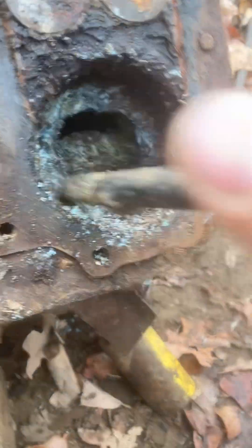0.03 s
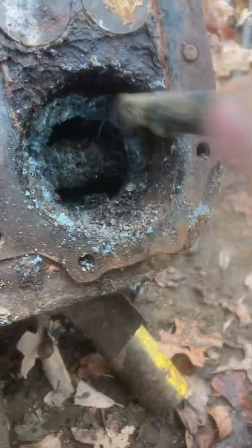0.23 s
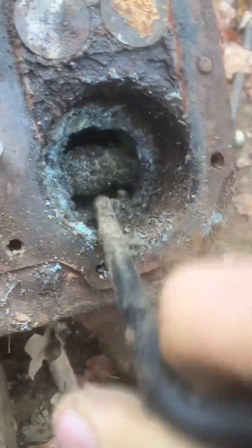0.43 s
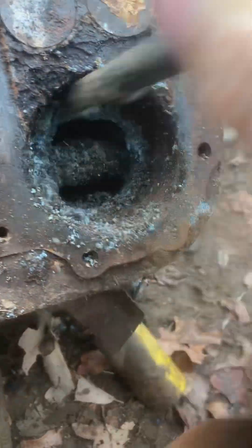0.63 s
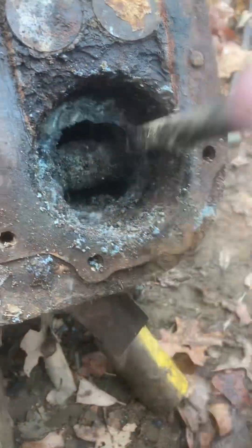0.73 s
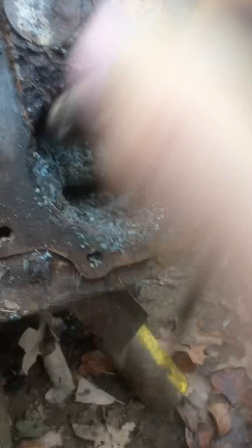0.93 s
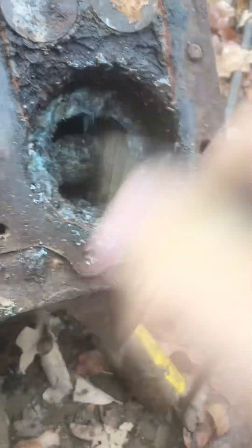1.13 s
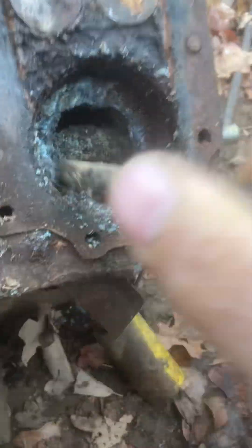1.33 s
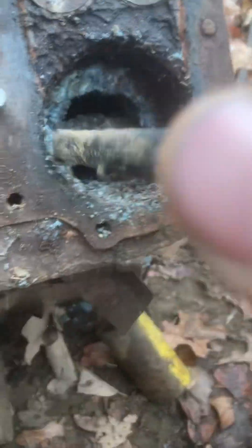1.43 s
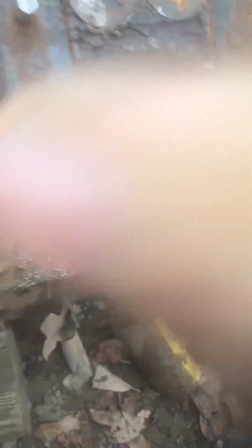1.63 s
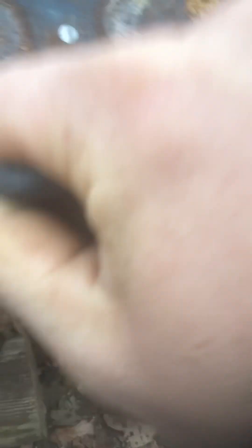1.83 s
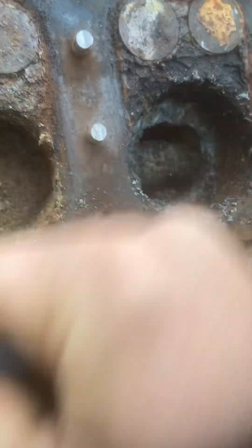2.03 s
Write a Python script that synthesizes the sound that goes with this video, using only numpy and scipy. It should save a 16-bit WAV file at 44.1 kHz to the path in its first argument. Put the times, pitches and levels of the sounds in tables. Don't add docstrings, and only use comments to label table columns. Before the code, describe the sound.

Close, dry, gritty metal clicks: a rod scratching crusted iron, dense quick blows mid-way, one sharp hit later, near quiet, then cloth rustle and final knocks with a dull hand bump, outdoors over low traffic rumble.

```python
import sys
import numpy as np
from scipy import signal
from scipy.fft import rfft, irfft, next_fast_len
from scipy.io import wavfile
from scipy.ndimage import map_coordinates

SR = 44100
rng = np.random.default_rng(int(sys.argv[2]) if len(sys.argv) > 2 else 0)


def field_ratio(decibels):
    return 10 ** (np.asarray(decibels, dtype=float) / 20)


def dump(signal):
    limited = np.clip(np.atleast_2d(signal).T, -1, 1)
    pcm = np.round(limited * 32767).astype(np.int16)
    wavfile.write(sys.argv[1], SR, pcm)


N = 92610

# start_s, length_s, level_db, block_over_rod_db, brightness_db
STROKES = [(-.02, 0.21, -44.5, -25, -5), (0.218, 0.071, -43.5, 4.5, -2.5), (0.341, 0.066, -50, 0.5, 6.5),
           (0.377, 0.086, -38.5, -9.5, 1), (0.47, 0.085, -44, -7.5, -6.5), (0.568, 0.12, -38, -7.5, 6),
           (0.673, 0.041, -33.5, -3, -1.5), (0.722, 0.17, -59.5, -17, 8.5), (0.802, 0.065, -34, -2, -11),
           (0.895, 0.038, -45.5, -19, 7), (0.928, 0.098, -44, -27, 4), (1.062, 0.076, -59.5, -5.5, 8.5),
           (1.141, 0.035, -40, 4, -28), (1.242, 0.085, -58, -21, 6), (1.367, 0.072, -53, -4, 0),
           (1.78, 0.049, -44, 3.5, 3.5), (1.816, 0.055, -49.5, 5, 2.5), (1.885, 0.11, -54.5, -6, -3),
           (2.032, 0.062, -58, -6, 4.5)]
# pitch_hz, level_db, t60_s
ROD_MODES = [(4007, 5, 0.02), (6854, -2, 0.016), (7587, 3.5, 0.013), (8660, -14, 0.047), (9220, -2, 0.017),
             (9547, 1.5, 0.016), (10400, -4.5, 0.014), (11080, -3.5, 0.022), (12350, -33, 0.017),
             (13230, -7, 0.024), (13850, -9, 0.022)]
# pitch_hz, level_db, t60_s
BLOCK_MODES = [(527, -12, 0.063), (724, 2, 0.11), (957, 4, 0.035), (1071.6, -1, 0.04), (1380, -1.5, 0.044),
               (1504, 1.5, 0.025), (1994, -5, 0.035), (2268, 3.5, 0.031), (2443, 3.5, 0.041),
               (2722, 5.5, 0.027), (3276, 12, 0.0061), (3635, 11.5, 0.0092)]
# freq_hz, level_db (per Hz)
HISS_COLOUR = [(350, -22), (650, 11), (1000, -4), (3500, 1), (5500, -44), (7500, -1), (10000, -8),
               (12200, -41), (13700, -17), (16500, -44)]
# time_s, level_db
BACKGROUND_LEVEL = [
    (0.0, -45.5),
    (0.28, -49),
    (0.78, -45.5),
    (1.0, -44),
    (1.15, -53.5),
    (1.39, -50.5),
    (1.57, -44),
    (1.63, -45),
    (2.1, -46),
]
# freq_hz, level_db (per Hz)
RUMBLE_COLOUR = [(12, -27), (20, -39), (59, -3), (97, -3), (278, -16), (323, -21.5), (435, -19.5),
                 (586, -22.5), (700, -15.5), (910, -30), (1540, -120)]
# freq_hz, level_db (per Hz)
AIR_COLOUR = [(240, -28), (400, -13), (1150, -11.5), (1460, -13), (2360, -11), (2710, -20), (4980, -12.5),
              (15000, -35), (16500, -46)]
# start_s, peak_db, block_over_rod_db, brightness_db, contact_pitch_hz
JABS = [(0.0044, -17, -17.5, -7, 1470), (0.0152, -26.5, -19, -13, 3900), (0.1092, -33.5, 1, -14, 3900),
        (0.2389, -3.5, -13.5, -32.5, 1600), (0.3531, -27.5, -12, -12, 1510),
        (0.3713, -18, -9.5, -8.5, 2250), (0.3923, -14, -35, -5, 3900), (0.4189, -21, -40, -33, 3900),
        (0.4458, -16.5, -25, -20.5, 990), (0.4797, -24.5, -37, -33, 4060), (0.54, -24.5, -12, -13, 3900),
        (0.5619, -18, -17.5, -9.5, 1010), (0.5715, -5, -45, -8, 3900), (0.606, -28, -32, -12, 1600),
        (0.6314, -22, -25, 2, 3300), (0.6452, -18, -10, -20, 1540), (0.6576, -15, -10, -14.5, 990),
        (0.6677, -15, -20, -8, 2400), (0.6774, -12.5, -5, -10, 990), (0.6833, -10, -7.5, -9.5, 2500),
        (0.6874, -15, -21, -24, 2460), (0.6938, -16, -29, -10, 2440), (0.7005, -23, -12, -6, 1500),
        (0.7832, -31, -30, 1, 1600),
        (0.8045, -9.5, -23, -10, 1900), (0.816, -10, -32, -6, 1900), (0.822, -6.5, -27, -28, 1900),
        (0.827, -3.5, -17, -39, 3900), (0.8303, -10, -6, -25, 1380), (0.8382, -10.5, -27, -17, 3820),
        (0.8465, -15.5, -14, -24, 3900), (0.857, -23, -22, -28, 3900), (0.9014, -24.5, -37, -14, 3900),
        (0.917, -24.5, -36, -10, 3900), (0.9456, -19.5, -48, 1, 1500), (0.9875, -22.5, -36.5, -5, 1010),
        (0.9938, -21, -41, -4, 1000), (1.05, -39, -30, -5, 2400), (1.071, -43, -18, -12, 2400),
        (1.1329, -30, -35, -11, 3900), (1.1542, -11, -4, -32, 3400), (1.158, -3.5, -26.5, -14.5, 2270),
        (1.178, -37, -18, -31, 3900), (1.279, -32.5, -35, 7, 3900), (1.3035, -29, -21, -6, 3900),
        (1.3742, -30.5, -33, -15, 3900), (1.3986, -29, -28, -12, 3900), (1.42, -27.5, -35, 0, 3900),
        (1.449, -44, -30, -8, 3900), (1.762, -11, -16, -10, 2200), (1.788, -30, -8, -11, 2300),
        (1.7915, -20.5, -28, 13, 2300), (1.8005, -20, -32, 0, 2300), (1.806, -10.5, -8, -0.5, 3640),
        (1.8438, -13.5, -10.5, -16.5, 2610), (1.9377, -33, -13.5, -9.5, 2400),
        (1.971, -32.5, -27.5, 9, 3600)]
# freq_hz, level_db
CRACK_COLOUR = [(350, -47), (1000, -15), (3000, 2.5), (5500, 6.5), (7500, 4), (10000, -5.5), (13000, -20),
                (16500, -45)]
# start_s, level_db, pitch_hz, t60_s
THUMPS = [
    (1.821, -19.5, 160, 0.056),
    (1.822, -27, 297, 0.022),
    (0.78, -30.5, 206, .05),
    (0.37, -27.5, 94, 0.076),
    (.93, -30, 83, .1),
]
# freq_hz, level_db (per Hz)
CLOTH_COLOUR = [(250, -40), (388, -3.5), (774, 2.5), (958, -13), (1430, -25), (2200, -8), (6000, -23),
                (10500, -29.5), (13200, -63)]
# freq_hz, likeness (0 to 1)
PORT_LIKENESS = [(60, .95), (250, .85), (700, .96), (1500, .88), (3000, .9), (5000, .93), (15000, .9)]
# freq_hz, level_db
PORT_TILT = [(60, -0.5), (240, -2.0), (950, -1.0), (3770, -1.5), (15000, 0.0)]
# freq_hz, lead_rad
PORT_LEAD = [(0, 0), (260, -0.7), (860, -3.4), (1450, -4.3), (1980, -3.8), (2330, -3.2), (4130, -4.3),
             (4910, -3.2), (6120, -2.7), (8010, -0.2), (9910, 0.8), (10600, 2.8), (12800, 3.4),
             (13900, 6.0), (16400, 6.5)]

BRIGHT_HZ = 8800


def unit(x):
    return x / np.sqrt(np.mean(x ** 2) + 1e-20)


def along(points, hz):
    f, v = np.transpose(points)
    return np.interp(np.log(hz + 1), np.log(f + 1), v)


def wobble(rate):
    knots = rng.standard_normal(int(N * rate / SR) + 4)
    return map_coordinates(knots, [np.arange(N) * rate / SR])


def filtered(x, response):
    m = next_fast_len(N + 8192)
    return irfft(rfft(x, m) * response(np.fft.rfftfreq(m, 1 / SR)), m)[..., :N]


def coloured(x, colour):
    return filtered(x, lambda hz: field_ratio(along(colour, hz)))


def noise(colour):
    return unit(coloured(rng.standard_normal((2, N)), colour))


def ringing(modes, scatter_db):
    t = np.arange(SR // 10) / SR
    hz, db, t60 = np.transpose(modes)[..., None]
    chance = rng.standard_normal((len(modes), 2))
    decay = field_ratio(db + scatter_db * chance[:, :1] - 60 * t / t60)
    detuned = hz * (1 + 0.0074 * chance[:, 1:])
    return np.sum(decay * np.sin(2 * np.pi * detuned * t), 0)


def grit_under_rod():
    grains_per_s, spread_db, judder_db = 8000, 3, 4.5
    draw = rng.random((3, N))
    size = field_ratio(-spread_db * np.log(draw[1] + 1 / 1000))
    grains = (draw[0] < grains_per_s / SR) * size * np.sign(draw[2] - .5)
    return unit(grains) * field_ratio(judder_db * wobble(70.335))


def scrape():
    edge_s, sag_db = 0.0046, -0.5
    drift_db, hiss_db = 6.5, -4
    t = np.arange(N) / SR
    rod, block, bright = np.zeros((3, N))
    for start, length, db, block_db, bright_db in STROKES:
        u = t - start
        edges = np.clip(np.minimum(u, length - u) / edge_s, 0, 1)
        shape = edges * field_ratio(db - sag_db * np.clip(u / length, 0, 1))
        rod += shape
        block += shape * field_ratio(block_db)
        bright += shape * field_ratio(bright_db)
    grit = grit_under_rod()

    def driven(level, mode):
        drift = unit(field_ratio(drift_db * wobble(34.99)))
        return signal.fftconvolve(grit * level * drift, ringing([mode], 0))[:N]

    steel = sum(driven(bright if mode[0] > BRIGHT_HZ else rod, mode) for mode in ROD_MODES)
    steel = steel / np.linalg.norm(ringing(ROD_MODES, 0))
    iron = sum(driven(block, mode) for mode in BLOCK_MODES)
    iron = iron / np.linalg.norm(ringing(BLOCK_MODES, 0))
    return steel + iron + field_ratio(hiss_db) * coloured(grit * rod, HISS_COLOUR)


def yard():
    level = field_ratio(np.interp(np.arange(N) / SR, *np.transpose(BACKGROUND_LEVEL)))
    rumble = field_ratio(3.5 + 1.66 * wobble(7.61)) * noise(RUMBLE_COLOUR)
    air = field_ratio(-9 + 1.3 * wobble(14)) * noise(AIR_COLOUR)
    return level * (rumble + air)


def hit_and_crush():
    level_db, t60_s = -20, .008
    force = rng.standard_normal(400) * field_ratio(level_db - 60 * np.arange(400) / SR / t60_s)
    force[0] += 1
    return force


def struck_metal(block_db, bright_db, focus_hz):
    focus_db, scatter_db = 11.5, 2
    block_gain_db, bright_gain_db, block_rise_s = 17.5, 13.5, .0015
    t = np.arange(SR // 10) / SR
    near = [(hz, db - focus_db * abs(np.log2(hz / focus_hz)), t60) for hz, db, t60 in BLOCK_MODES]
    rod = [(hz, db + (hz > BRIGHT_HZ) * (bright_db + bright_gain_db), t60) for hz, db, t60 in ROD_MODES]
    block = ringing(near, scatter_db) * (1 - np.exp(-t / block_rise_s))
    return ringing(rod, scatter_db) + field_ratio(block_db + block_gain_db) * block


def lead_in():
    level_db, rise_s = -24, .0012
    return rng.standard_normal(600) * field_ratio(level_db) * np.exp(-np.arange(600, 0, -1) / SR / rise_s)


def jabs():
    gain_db, crack_db, crack_t60_s = 2, -10, .007
    t = np.arange(SR // 10) / SR
    rings, cracks = np.zeros((2, N + SR))
    for start, db, block_db, bright_db, focus_hz in JABS:
        i = round(start * SR)
        crush = hit_and_crush()
        metal = struck_metal(block_db, bright_db, focus_hz)
        ring = signal.fftconvolve(metal, np.append(lead_in(), crush))
        rings[i:i + len(ring)] += field_ratio(db + gain_db) * ring / np.abs(ring).max()
        crack = field_ratio(db + gain_db + crack_db - 60 * t / crack_t60_s) * rng.standard_normal(len(t))
        cracks[i:i + len(t)] += crack
    return rings[600:N + 600] + coloured(cracks[:N], CRACK_COLOUR)


def reflections(metal):
    t60_s = np.array([[.02], [0.083]])
    t = np.arange(SR // 8) / SR
    tails = rng.standard_normal((2, len(t))) * field_ratio(-60 * t / t60_s)
    tails = tails / np.linalg.norm(tails, axis=1)[:, None]
    return signal.fftconvolve(metal[None], tails, axes=1)[:, :N]


def thumps():
    out = np.zeros(N)
    for start, db, hz, t60 in THUMPS:
        u = np.clip(np.arange(N) / SR - start, 0, None)
        out += field_ratio(db - 60 * u / t60) * np.sin(2 * np.pi * hz * u) * (1 - np.exp(-u / 0.00067))
    return np.array([out, 0 * out])


def sleeve():
    peak_s, rise_s, fall_s, level_db = 1.614, 0.084, 0.035, -39.5
    u = np.arange(N) / SR - peak_s
    swell = np.exp(-(u / np.where(u < 0, rise_s, fall_s)) ** 2)
    return field_ratio(level_db + 4.2 * wobble(39.3)) * swell * noise(CLOTH_COLOUR)


def scene():
    echo_db = -19
    metal = jabs() + scrape()
    differing, echo = reflections(metal)
    pair = np.array([metal + field_ratio(echo_db) * echo, differing]) + yard() + thumps() + sleeve()

    def blend(hz):
        angle = np.arccos(np.clip(along(PORT_LIKENESS, hz), -1, 1)) / 2
        return np.array([np.cos(angle), np.sin(angle)])

    shared, apart = filtered(pair, blend)
    return np.array([shared + apart, shared - apart])


def roll_off(x):
    return signal.sosfilt(signal.butter(12, 16810, fs=SR, output="sos"), x)


def record(dry):
    top_hz = 15500
    half = np.array([[.5], [-.5]])

    def ports(hz):
        level = field_ratio(half * along(PORT_TILT, hz))
        phase = np.exp(1j * half * along(PORT_LEAD, hz))
        return level * phase / (1 + (hz / top_hz) ** 20)

    return roll_off(filtered(dry, ports))


dry = scene()
out = record(dry)
dump(out)
```